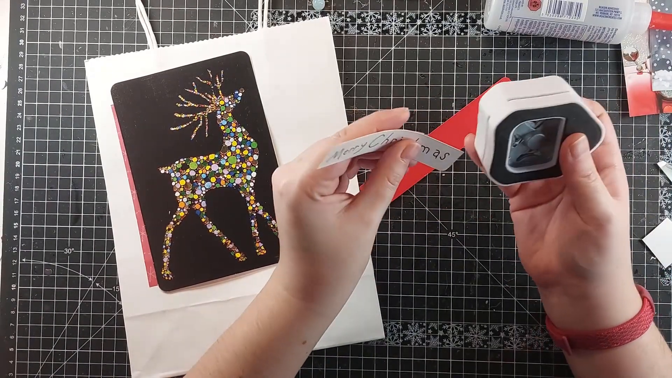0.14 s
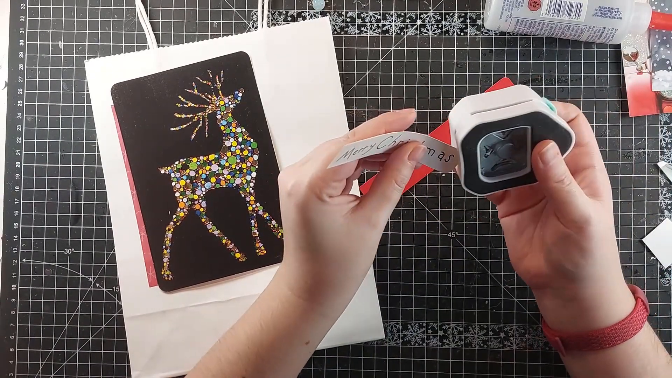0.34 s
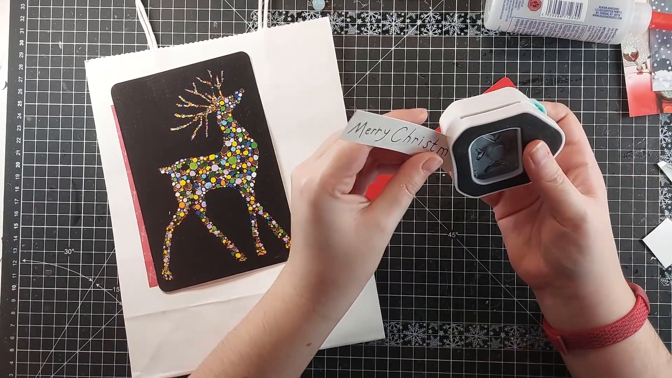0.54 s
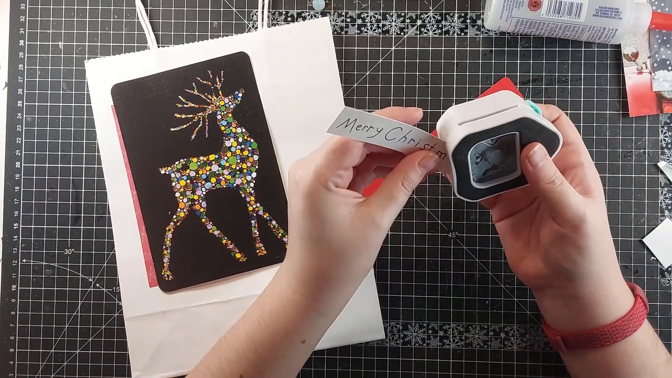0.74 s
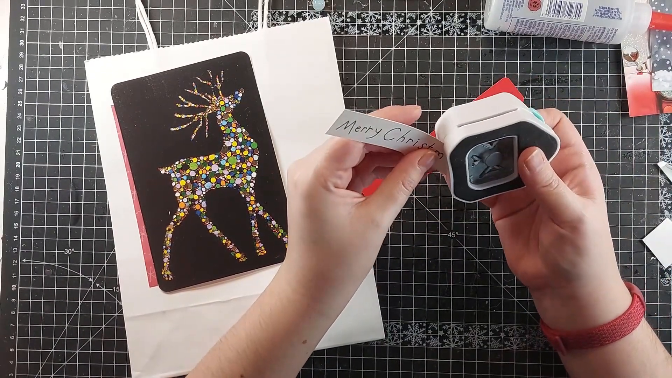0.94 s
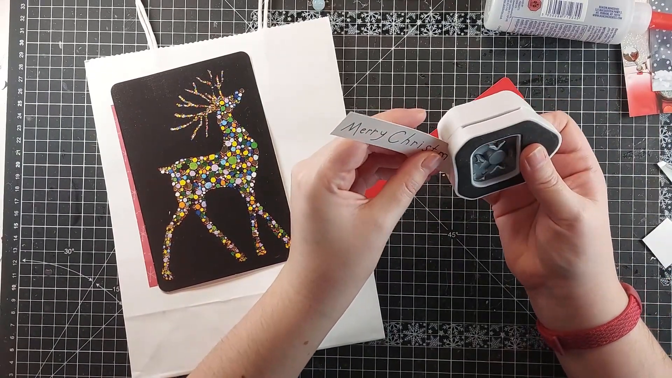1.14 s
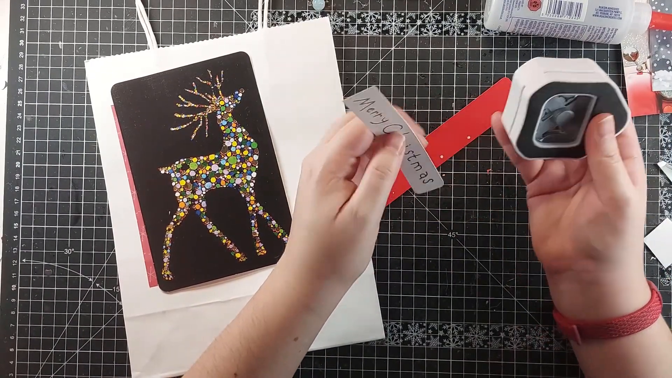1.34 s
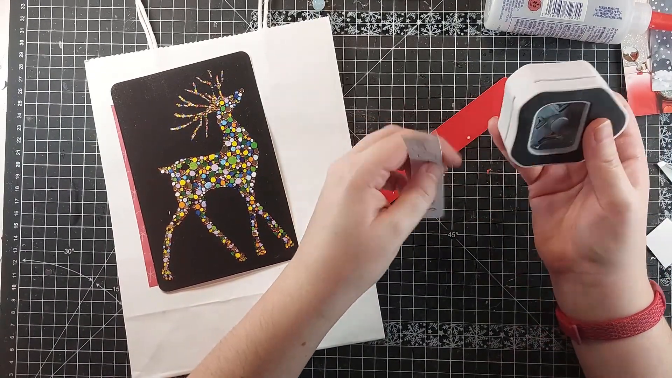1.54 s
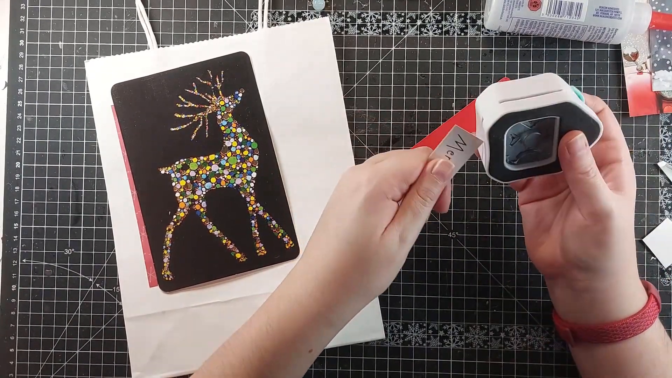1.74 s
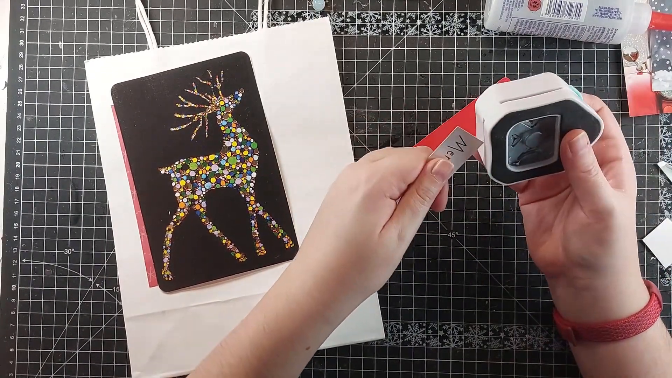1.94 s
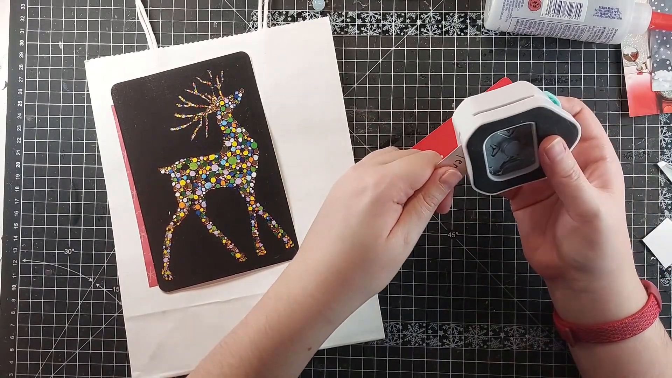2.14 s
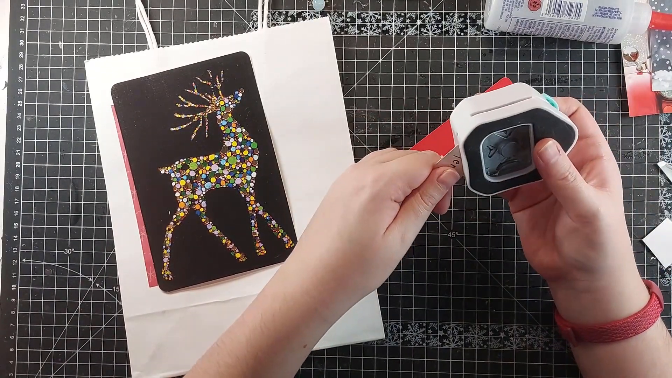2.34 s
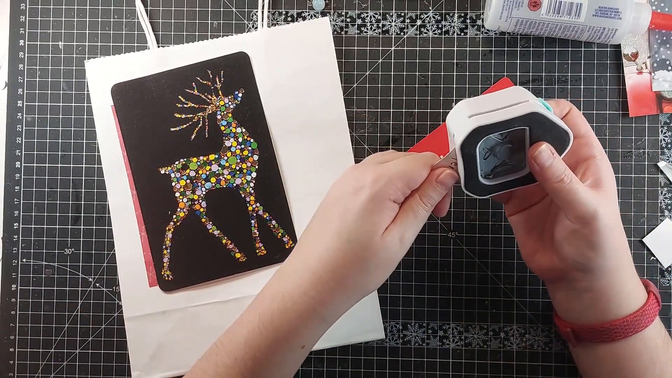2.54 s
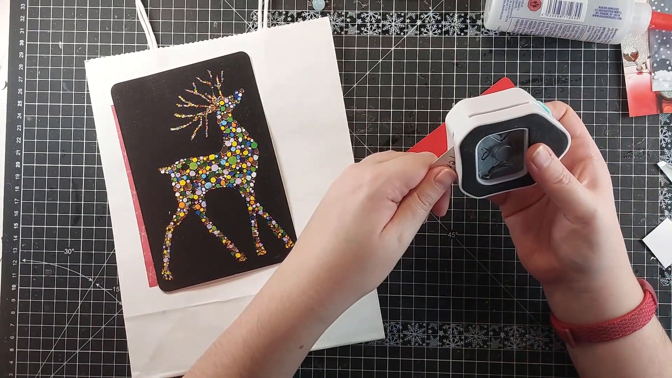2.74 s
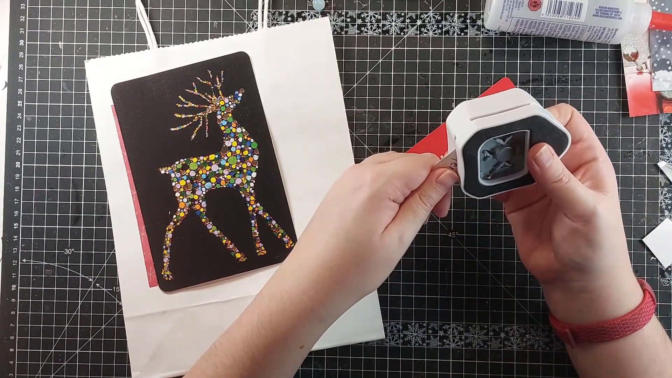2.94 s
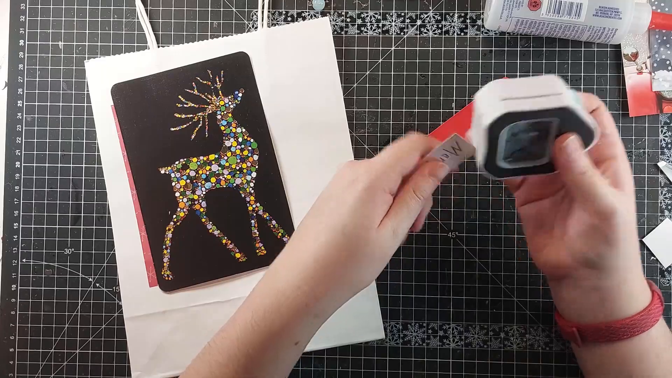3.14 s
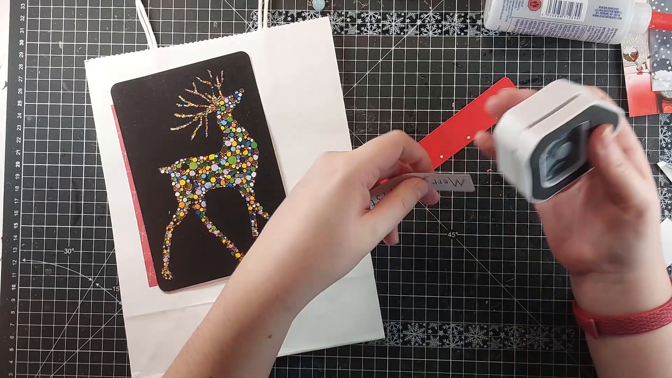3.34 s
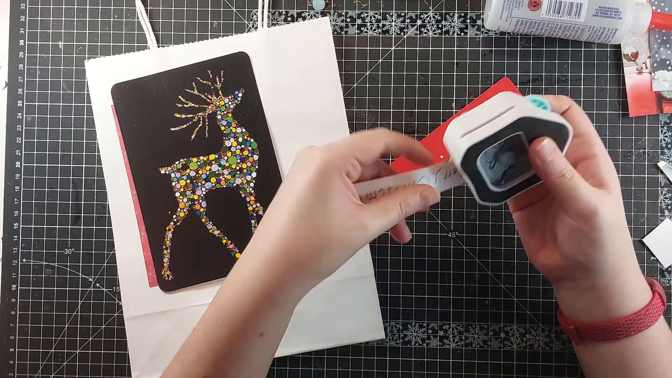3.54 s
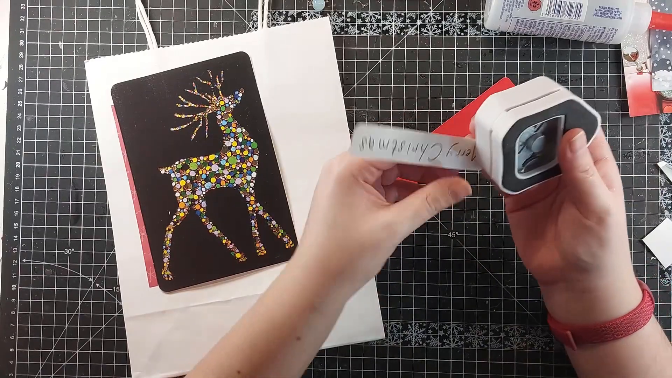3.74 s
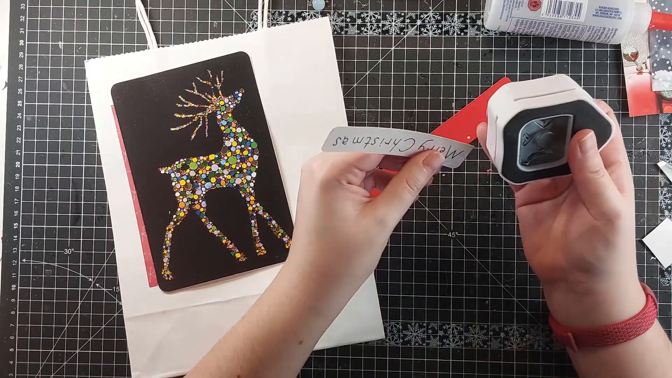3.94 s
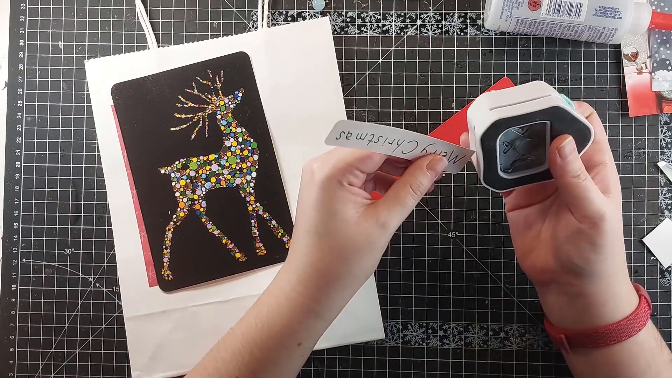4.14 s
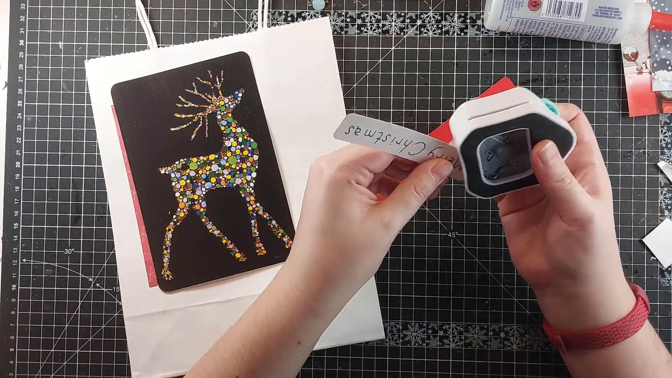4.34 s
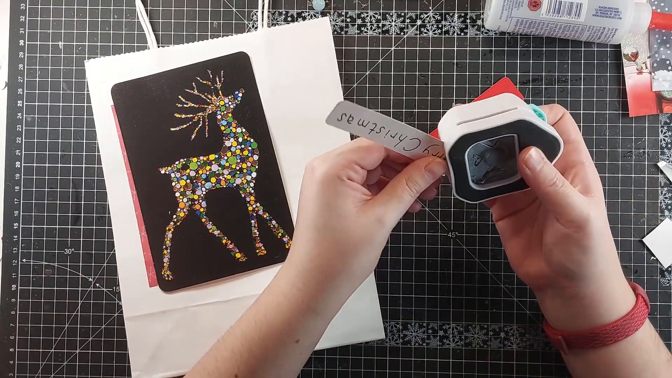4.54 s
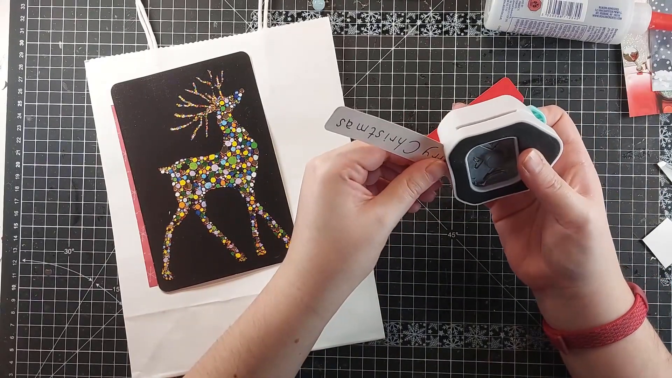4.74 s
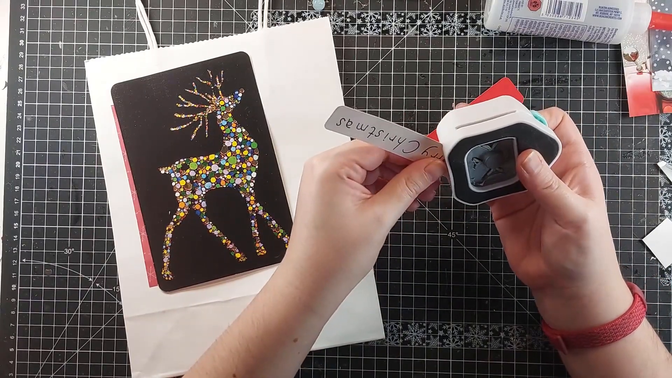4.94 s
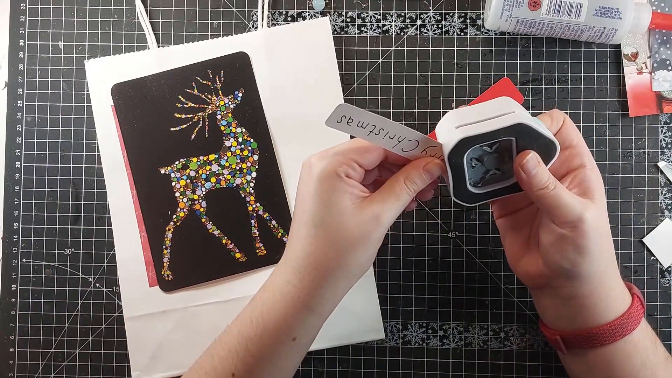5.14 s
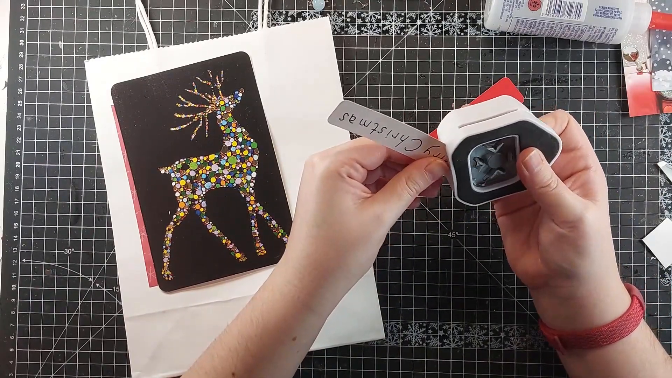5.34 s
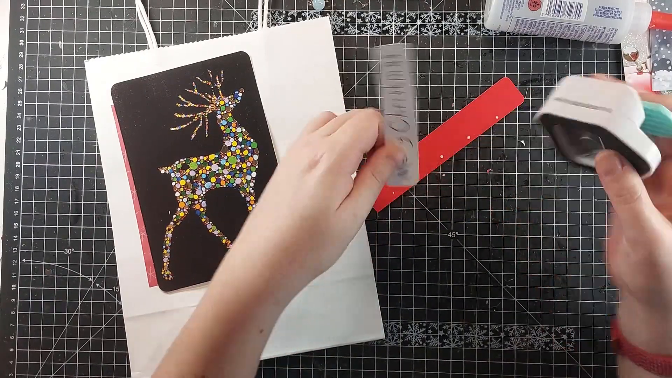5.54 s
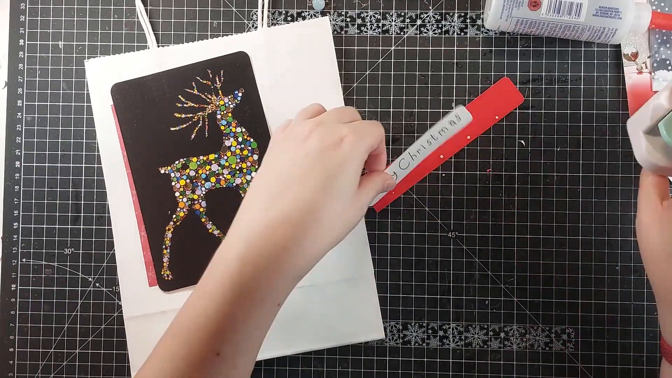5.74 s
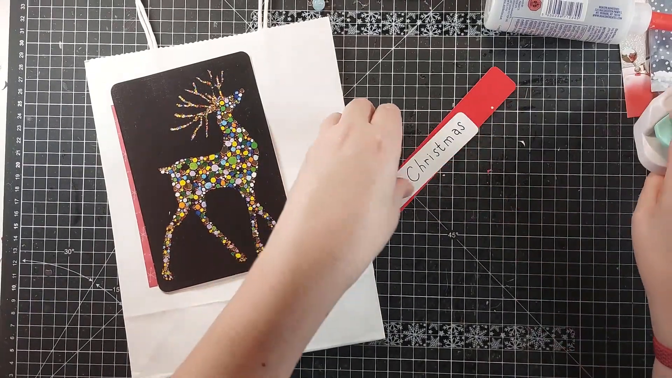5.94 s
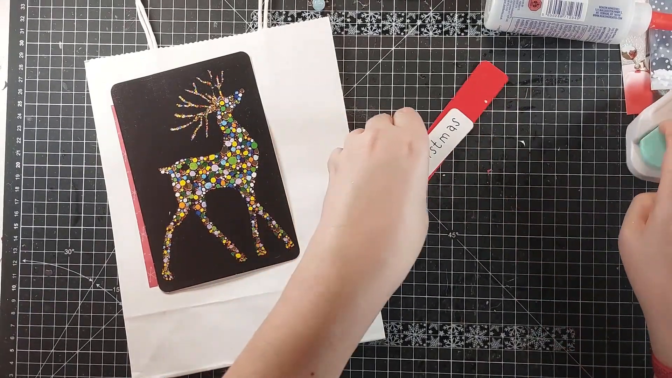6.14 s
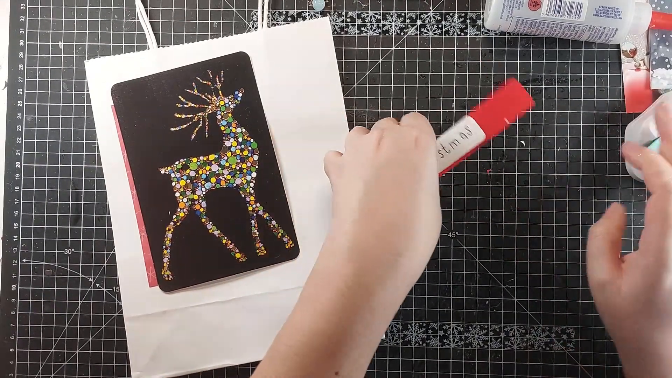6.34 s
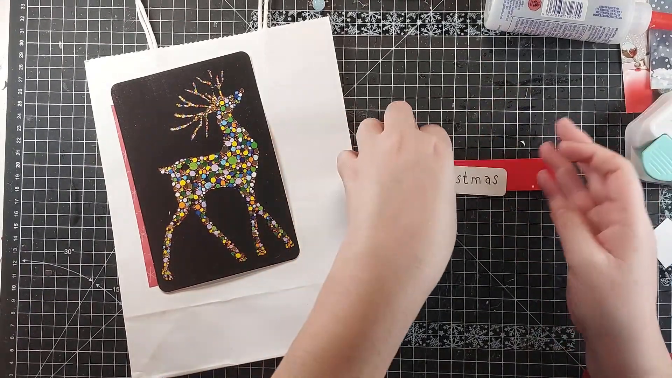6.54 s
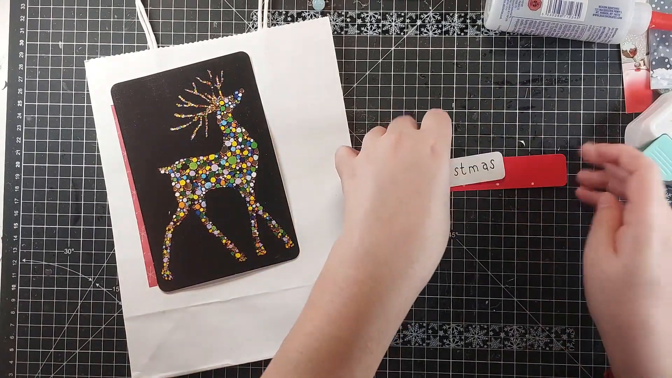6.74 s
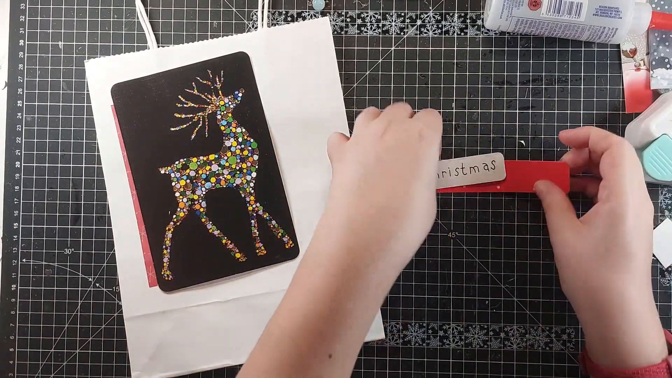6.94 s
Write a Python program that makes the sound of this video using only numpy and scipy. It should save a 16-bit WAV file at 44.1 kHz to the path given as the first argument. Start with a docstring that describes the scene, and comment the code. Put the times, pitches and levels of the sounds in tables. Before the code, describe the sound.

Close stereo pickup in a small quiet room. Fingers slide card into a little plastic punch with soft grainy scrapes and tiny ticks. Three hard, bright snaps come about two seconds apart, each with a brief tearing crunch and hollow plastic knock. Afterwards the punch shuffles on the mat, is put down with a woody thud, and light rustles follow.

```python
"""Fingers and card rub and tick on a small plastic corner punch over a craft table in a small quiet room.
Near 1.1, 3.0 and 5.2 s a squeeze makes the lever bite, then the blade snap through: tearing noise and a knock.
Between, the card strokes skin and slot as dense grainy noise; from 5.4 s the punch shuffles on the mat as well.
Near 6.2 s it is set down with a thud that rings the table top's modes; rustles and ticks follow to the end.
Sparse reflections surround the punch and card; rumble and hiss lie under everything."""
import sys
import numpy as np
from scipy import signal
from scipy.io import wavfile
from scipy.ndimage import uniform_filter1d

SR = 44100
rng = np.random.default_rng(int(sys.argv[2]) if len(sys.argv) > 2 else 0)


def volts_from_decibels(level):
    """Turn decibel levels (scalar or array-like) into linear amplitude factors."""
    exponent = np.asarray(level, float) / 20
    return 10 ** exponent


def to_wav(s):
    """Save 16-bit WAV."""
    ch = np.atleast_2d(s).T  # columns
    pcm = np.round(np.clip(ch, -1, 1) * 32767)  # PCM
    wavfile.write(sys.argv[1], SR, pcm.astype(np.int16))


N = 312669

# Event levels are set ahead of the final balance in record().
# Ring of the punch, from cavity through shell to blade and spring: mode_hz, width_hz, relative_level_db
PUNCH_MODES = [(386, 130, 2.5), (650, 230, -5.5), (1041, 89, 5.5), (1380, 190, -14), (1337, 130, 7),
               (1800, 850, 5.5), (2570, 700, 3), (2552, 94, 6.5), (3400, 1000, 4), (3890, 630, 0),
               (4030, 67, 2), (4710, 450, 1), (5700, 1200, -2.5), (7600, 900, 2.5), (9253, 760, 0),
               (10680, 1000, 1.5), (12000, 1200, 3), (14180, 1200, 3.5), (15970, 1100, -3.5)]
# Limits of the cavity, the shell, and the blade with its spring: low_hz, high_hz
PUNCH_BANDS = [(200, 1250), (1150, 3300), (2700, 20000)]
# Lever bites and blade snaps: knock_s, knock_db, bright_db, knock_hz, shear_ms
SNAPS = [(1.045, -21.5, -26, 2290, 11), (1.1216, 1, 4.5, 1602, 5.2), (2.9962, -12, -20.5, 1809, 5.3),
         (3.0295, -4, 0, 1473, 4.5), (5.1808, -17, -22, 1720, 6.5), (5.2745, -2, 1.5, 1480, 6.2)]
# Card and fingers ticking on the punch: knock_s, knock_db, bright_db, knock_hz, hollow_db
TICKS = [(.493, -36, -50, 1940, -46.5), (.509, -49, -37, 2230, -40), (.682, -42.5, -43, 1890, -53.5),
         (.9606, -53, -61.5, 1680, -70), (1.0132, -47, -44, 1630, -60), (1.21, -32, -30, 1483, -53),
         (1.238, -27, -29, 2790, -53), (1.444, -60, -41.5, 2490, -55.5), (1.5328, -70.5, -45, 2130, -61),
         (1.5762, -53, -44.5, 1915, -55.5), (1.6321, -60.5, -38.5, 2280, -59.5),
         (2.173, -60, -45.5, 2090, -49.5), (2.418, -48, -57, 2800, -50.5),
         (2.9745, -36, -38.5, 1900, -47.5), (3.0043, -29.5, -31, 1630, -45.5),
         (3.139, -30.5, -36.5, 1780, -45.5), (3.1922, -29, -37, 1800, -49), (3.4794, -62, -46.5, 2260, -61),
         (3.6177, -61, -44.5, 2054, -49.5), (3.678, -35, -38, 2220, -69), (3.8867, -64.5, -38, 2290, -65),
         (3.9544, -60, -33, 2165, -45.5), (4.2546, -20.5, -18, 2590, -27), (4.426, -35.5, -39.5, 1900, -51),
         (4.4501, -40, -49.5, 1780, -67), (4.479, -41, -52, 1700, -48.5), (4.586, -46, -57.5, 2000, -53.5),
         (4.7958, -48.5, -54, 1857, -48), (5.0887, -55.5, -51.5, 1644, -65),
         (5.1422, -47.5, -46, 1860, -58.5), (5.1883, -33, -35.5, 1670, -42), (5.4614, -34, -40, 1700, -50),
         (5.4959, -28, -22, 2010, -31), (5.5584, -50, -46.5, 1790, -50), (5.5862, -62.5, -42, 1740, -36.5),
         (5.6079, -46, -38, 2140, -38), (5.805, -69.5, -51, 2290, -58), (5.885, -55.5, -38.5, 2426, -69),
         (6.2417, -26, -26, 1380, -18), (6.389, -50.5, -42, 2480, -45), (6.4578, -63, -41.5, 2060, -61),
         (6.5079, -62, -39.5, 2510, -54), (6.8305, -42.5, -51, 2400, -55),
         (6.9526, -62, -48.5, 1960, -66.5), (7.0244, -62.5, -34, 1780, -57)]
# Strokes of the card: peak_s, skin_relative_db, slot_relative_db, rise_s (per 20 dB), fall_s (per 20 dB)
STROKES = [(0.0, -44.5, -50.5, .02, 0.0366), (.226, -69.5, -72, 0.17, 0.08),
           (.512, -45, -46.5, 0.04, 0.0268), (.62, -63, -63.5, 0.34, 0.24), (.686, -66, -57.5, .008, 0.05),
           (.85, -85, -70, 0.24, 1.2), (.964, -73, -55, .006, 0.34), (1.016, -47, -52, -0.01, 0.05),
           (1.043, -35, -37, 0.0057, -0.04), (1.19, -36.5, -41, -0.0423, 0.0322),
           (1.255, -44, -39, 0.0671, 0.0528), (1.282, -43, -40, 0.0464, 0.006),
           (1.386, -52.5, -66, 0.14, 0.11), (1.447, -50, -73.5, -0.06, 0.13), (1.486, -51, -82, 0, 0.22),
           (1.6, -47, -56, -0.2, 0.1037), (1.652, -55, -72, -0.02, .09), (1.832, -84, -66, -0.2, .045),
           (2.108, -67, -71.5, 0.14, 0.37), (2.18, -55.5, -63, 0.06, 0.08), (2.21, -68, -61, 0.12, -0.02),
           (2.418, -62.5, -59.5, -0.1, 0.12), (2.902, -82, -69, 0.23, 0.1), (2.978, -54, -44, -0.06, .1),
           (3.1, -48, -54, 0.0648, 0.14), (3.141, -50, -49, .005, 0.09), (3.17, -52, -48.5, 0.0056, 0.1354),
           (3.194, -42, -39, 0.01, 0.0638), (3.213, -43, -47.5, .02, 0.0555), (3.27, -55, -64, 0.06, 0.12),
           (3.386, -49.5, -61.5, 0.07, 0.1), (3.483, -57.5, -68, 0.08, 0.09), (3.52, -60, -67, 0.07, 0.12),
           (3.626, -52, -57, 0.04, .1), (3.676, -49.5, -46.5, -0.09, 0.06), (3.8, -57, -72, 0.1, -0.27),
           (3.834, -55.5, -62, -0.34, -0.1), (3.889, -47.5, -71.5, 0.07, 0.06),
           (3.92, -53, -55.5, -0.1, 0.05), (3.958, -50, -61, .006, .06), (4.33, -65, -61, 0.14, .1),
           (4.43, -55, -52, 0.02, 0.14), (4.492, -58, -46.5, 0.01, -0.0152), (4.582, -70, -68, 0.66, 0.2),
           (4.794, -63.5, -59, -0.03, 0.05), (5.004, -69.5, -79, 0.17, 0.1), (5.096, -68, -62.5, .04, 0),
           (5.145, -58, -54, 0.02, 0.1), (5.36, -49.5, -71.5, 0.1, -0.43), (5.414, -65, -57, 0.13, -0.1),
           (5.47, -43.5, -45.5, 0.0936, 0.0457), (5.5, -43, -45.5, 0.0945, 0.015),
           (5.59, -52, -50, 0.03, 0.14), (5.61, -50, -50.5, 0.05, 0.13), (5.715, -61, -61, .05, 0.15),
           (5.804, -63, -82, -0.5, 0.54), (5.889, -51.5, -62, -0.2, 0.28), (5.976, -52.5, -62, .04, 0.22),
           (6.07, -58, -72, .1, 0.2), (6.195, -51, -68, 0.11, .05), (6.26, -49, -43, 0.11, 0.14),
           (6.395, -45, -56.5, -0.11, 0.0254), (6.51, -49, -68, 0.03, 0.01), (6.55, -60, -78.5, 0.4, -0.1),
           (6.598, -58.5, -60, 0.16, 0.19), (6.65, -72, -58, -0.76, .05), (6.766, -66.5, -77, -1, 0.33),
           (6.832, -62.5, -54.5, -0.4, 0.02), (6.946, -53, -87.5, -0.17, -0.96), (7.028, -50, -76, 0.13, 0),
           (7.07, -47, -61, .05, 0.76)]
# Scrape pitch, set by how deep the card sits in the slot: time_s, pitch_hz
SLOT_PITCH = [(0, 1808), (.68, 1981), (.94, 1895), (.97, 1700), (1.03, 1800), (1.19, 1620), (1.29, 2154),
              (1.6, 2287), (3.196, 1768), (3.45, 2259), (3.7, 2252), (3.86, 1930), (4.49, 1780),
              (5.41, 1596), (5.5, 2068), (5.72, 1400), (5.9, 2500), (6.15, 2500), (6.28, 1650),
              (6.62, 1600), (6.85, 2192)]
# Colour of rubbing on skin: frequency_hz, relative_density_db (per Hz)
SKIN_COLOUR = [(1180, -21.5), (2000, -11.5), (2590, -6.5), (3130, -17), (5170, 0.5), (6100, -3), (7300, 2),
               (9000, -2.5), (12900, -1.5), (15700, -1)]
# Jolts that reach the table top: start_s, peak_db, left_minus_right_db, contact_ms
THUDS = [(1.042, -28.5, 3.5, .93), (1.118, -18.5, 2, 1), (2.992, -32, 8, 0.77), (3.027, -28, 7, .99),
         (3.19, -47, 12, 0.75), (4.251, -50.5, 2.1, .29), (5.175, -40.5, 11.5, .62), (5.269, -30, 5, 0.69),
         (5.557, -30.5, 4.5, 0.92), (5.583, -35, -2, 0.5), (5.622, -52, -1, .99), (5.923, -31.5, 8, 0.55),
         (5.943, -23, 3, 0.51), (6.099, -34, 0.5, 0.38), (6.227, -9, 3, 0.5), (6.244, -10, -3, 0.25),
         (6.271, -12.5, -2.5, 0.25), (6.388, -32, 2, 0.76), (6.493, -40, 11, 0.46), (6.589, -27.5, 5, 0.75),
         (6.621, -31, 1.5, 0.32), (6.789, -38, 8, 0.57), (6.829, -37.5, 4, 0.51)]
# Ring of the table top: mode_hz, relative_level_db, t60_s
TABLE_MODES = [(65, 0.5, 0.1), (116, 0.5, 0.2), (141, -3, 0.26), (196, -4, 0.07), (237.5, 0, 0.13),
               (263, 0.5, 0.1), (340, -3.5, 0.15), (435.7, -9.5, 0.03), (478, -7.5, 0.065), (578, -9, 0.11),
               (602, -8, 0.075), (722, -11, 0.054), (949.4, -6.5, 0.04), (1210, -8, 0.042),
               (1410, -2, 0.025), (1700, -9, 0.025)]
# Hands and punch shuffling on the mat: time_s, relative_level_db
SHUFFLE_LEVEL = [(5.399, -54), (5.456, -54.5), (5.756, -57.5), (5.929, -68), (5.978, -55), (6.096, -43.5),
                 (6.138, -55), (6.256, -44.5), (6.472, -53.5), (6.75, -51), (6.896, -56), (7.09, -60.5)]
# Dying time of the room: frequency_hz, t60_s
ROOM_DECAY = [(300, 0.32), (1100, .2), (2900, 0.18), (4200, .2), (7700, 0.15), (14000, 0.13)]
# Colour of the reflections: frequency_hz, relative_level_db
ROOM_COLOUR = [(300, -12.5), (700, -4), (1400, -14.5), (2500, -8), (4000, 1), (7000, -8), (10000, -4),
               (14000, -2.5)]
# Colour of rumble and hiss: frequency_hz, relative_density_db (per Hz)
AIR_COLOUR = [(12, -46), (20, -8.5), (53, 5), (107, -3), (176, -10.5), (233, -10.5), (585, -21.5),
              (1020, -20.5), (1310, -24.5), (1840, -29.5), (3490, -34), (5930, -40), (8290, -34.5),
              (13300, -35), (15700, -35.5)]
# Likeness of the air in left and right: frequency_hz, likeness (0 to 1)
AIR_LIKENESS = [(60, 0.59), (240, 0.23), (950, 0.0084), (3770, 0.072), (15000, 0.034)]


def evened(x):
    """Scales to rms 1."""
    return x / np.sqrt(np.mean(x ** 2) + 1e-20)


def peaked(x):
    """Scales to peak 1."""
    return x / abs(x).max()


def read(points, hz):
    """Reads a spectrum on a log-frequency axis."""
    f, value = np.transpose(points)
    return np.interp(np.log(hz + 1), np.log(f + 1), value)


def balance(left_minus_right_db):
    """Splits a level difference evenly between the two channels, in dB."""
    return left_minus_right_db * np.array([[0.5], [-0.5]])


def add(mix, s, sound):
    """Mixes a sound of several rows in at time s."""
    part = mix[:, round(s * SR):][:, :sound.shape[1]]
    part += sound[:, :part.shape[1]]


def pair(size, same):
    """Two noises that are partly alike, one for each microphone."""
    a, b = rng.standard_normal((2, size))
    return np.array([a, same * a + np.sqrt(1 - same ** 2) * b])


def spectra(same):
    """Random short-time spectra for both microphones, alike by the share same."""
    a, b, c, d = rng.standard_normal((N // 256 + 5, 513, 4)).T
    left, other = a + 1j * b, c + 1j * d
    return np.array([left, same * left + np.sqrt(1 - same ** 2) * other])


def coloured(points, z):
    """Turns random short-time spectra into noise of rms 1 with the given colour."""
    hz = np.fft.rfftfreq(1024, 1 / SR)
    z = z * volts_from_decibels(read(points, hz))[:, None]
    noise = signal.istft(z, nperseg=1024, noverlap=768)[1]
    return evened(noise[:, :N])


def ring(lo, hi, knock_hz=None):
    """Impulse response of one part of the punch; the grip shifts its modes a little and favours one pitch."""
    t = np.arange(1024) / SR
    shift = 1 + 0.02 * rng.standard_normal(len(PUNCH_MODES))
    modes = np.zeros(len(t))
    for k, (hz, width, db) in enumerate(PUNCH_MODES):
        if lo <= hz < hi:
            decay = width * np.exp(-np.pi * width * t)
            modes += (-1) ** k * volts_from_decibels(db) * decay * np.sin(2 * np.pi * hz * shift[k] * t)
    modes = peaked(modes)
    if knock_hz:
        modes = modes - 1.3 * np.exp(-np.pi * 300 * t) * np.sin(2 * np.pi * knock_hz * t)
    band = signal.butter(3, (lo, hi), "band", fs=SR, output="sos")
    return signal.sosfilt(band, modes)[None]


def click(s, knock_db, hollow_db, bright_db, shear_ms, knock_hz, crackle):
    """Fibres tear harder and harder, then one knock and a short crackle; the treble tears late.
    Rows: left, right, and twice the bare knock of equal energy, which is what spreads to the walls."""
    ms = np.arange(-441, 1764) / SR * 1000  # from the knock
    shear = np.clip(1 + ms / shear_ms, 0, 1)
    hit = ms == 0
    # impulse response, level dB, left-right likeness, tearing curve, crackle fall ms, knock strength
    parts = [(ring(*PUNCH_BANDS[0]), hollow_db, 0.9, 0.6, 3.0, 6.0),
             (ring(*PUNCH_BANDS[1], knock_hz), knock_db, 0.7, 1.2, 1.2, 7.0),
             (ring(*PUNCH_BANDS[2]), bright_db, 0.2, 3.0, 2.0, 1.5)]
    sound = 0
    for response, db, same, curve, fall_ms, knock in parts:
        dying = np.exp(-np.maximum(ms, 0) / (fall_ms * crackle))
        blow = pair(len(ms), same) * np.where(ms < 0, shear ** curve, dying)
        near = peaked(signal.fftconvolve(blow + knock * hit, response, axes=1))
        spread = signal.fftconvolve(np.ones((2, 1)) * hit, response, axes=1)
        sound = sound + volts_from_decibels(db) * np.vstack([near, evened(spread) * near.std()])
    return s - 0.01, sound


def snaps():
    """The lever bites, then the blade shears through the card and knocks, with the cavity under it."""
    punch = np.zeros((4, N))
    for s, knock_db, bright_db, hz, shear_ms in SNAPS:
        hollow_db = knock_db - 18.5
        add(punch, *click(s, knock_db, hollow_db, bright_db, shear_ms, hz, crackle=1.05))
    return punch


def ticks():
    """Card and fingers touch the punch: the same knock with hardly any tearing ahead of it."""
    punch = np.zeros((4, N))
    for s, knock_db, bright_db, hz, hollow_db in TICKS:
        add(punch, *click(s, knock_db, hollow_db, bright_db, 0.18, hz, crackle=1))
    return punch


def strokes():
    """Level of skin rubbing and slot scraping: each stroke climbs and falls straight in dB; powers add up."""
    t = np.arange(0, N + 64, 64) / SR
    power = np.zeros((2, len(t)))
    for s, skin_db, slot_db, rise_s, fall_s in STROKES:
        # slopes under 4 ms, negative ones too, are taken as 4 ms
        rise, fall = (s - t) / max(rise_s, 0.004), (t - s) / max(fall_s, 0.004)
        under_db = np.minimum(20 * np.where(t < s, rise, fall), 150)
        power += volts_from_decibels(np.array([[skin_db], [slot_db]]) - under_db) ** 2
    return np.array([np.interp(np.arange(N) / SR, t, p) for p in np.sqrt(power)])


def resonate(x, hz, width):
    """A resonance of gain 1 that follows the curve hz."""
    turn = np.exp(2j * np.pi * np.cumsum(hz) / SR)
    r = np.exp(-np.pi * width / SR)
    return 2 * (turn * signal.lfilter([1 - r], [1, -r], x / turn)).real


def grains():
    """Uneven strength of rubbing on skin and in the slot: random tiny slips over a steady share."""
    slips_per_s = np.array([[900], [250]])
    size_db = [[3.0], [4.0]] * np.minimum(rng.exponential(1, (N, 2)).T, 2.5)
    slips = volts_from_decibels(size_db) * (rng.random((N, 2)).T < slips_per_s / SR)
    slips = uniform_filter1d(slips, 40, axis=1)
    return [[0.8], [0.6]] + [[0.3], [0.18]] * slips / slips.mean(1, keepdims=True)


def rubbing():
    """Dense tiny slips: bright on the fingers, pitched by the shell and cavity in the slot."""
    skin_level, slot_level = uniform_filter1d(strokes(), 80, axis=1)
    skin_grain, slot_grain = grains()
    skin = evened(coloured(SKIN_COLOUR, spectra(0.2)) * skin_grain)
    scrape = pair(N, 0.4) * slot_grain
    body = ring(*PUNCH_BANDS[1]) + volts_from_decibels(-4.5) * ring(*PUNCH_BANDS[0])
    shell = evened(signal.fftconvolve(scrape, body, axes=1)[:, :N])
    s, pitch_hz = np.transpose(SLOT_PITCH)
    pitch = np.interp(np.arange(N) / SR, s, pitch_hz)
    slot = evened(shell + 1.9 * evened(resonate(scrape, pitch, 280)))
    rubs = skin * skin_level * volts_from_decibels(2.5) + slot * slot_level
    return rubs * volts_from_decibels(balance(0.5))


def board():
    """The table top's ring; where it is touched decides how strongly each mode speaks."""
    t = np.arange(SR // 3) / SR
    place = [2, 0.02] * rng.standard_normal((len(TABLE_MODES), 2))  # dB and share of pitch
    modes = np.zeros(len(t))
    for k, (hz, db, t60) in enumerate(TABLE_MODES):
        level = volts_from_decibels(db + place[k, 0] - 60 * t / t60)
        modes += (-1) ** k * level * np.sin(2 * np.pi * hz * (1 + place[k, 1]) * t)
    # too small to radiate lower
    return signal.sosfilt(signal.butter(4, 60, "high", fs=SR, output="sos"), modes)


def thud(db, left_minus_right_db, contact_ms, rattle_ms):
    """A soft push and a short rattle set the table top ringing; long contact keeps it dull."""
    ms = np.arange(SR // 10) / SR * 1000
    push = ms * np.exp(-ms / contact_ms)
    rattle = pair(len(ms), 0.95) * np.exp(-ms / rattle_ms)
    rattle[:, 0] += 13.0  # the first touch
    pushed_board = signal.fftconvolve(board(), push)[None]
    sound = signal.fftconvolve(rattle, pushed_board, axes=1)
    return volts_from_decibels(db + balance(left_minus_right_db)) * peaked(sound)


def thuds():
    """Jolts of the table top, the strongest ones as the punch is set down."""
    table = np.zeros((2, N))
    for s, db, left_minus_right_db, contact_ms in THUDS:
        rattle_ms = 14 + 0.01 * db  # weaker jolts settle a touch sooner
        add(table, s, thud(db, left_minus_right_db, contact_ms, rattle_ms))
    return table


def shuffle():
    """Steady dull friction on the mat feeds the table top."""
    s, db = np.transpose(SHUFFLE_LEVEL)
    dull = signal.lfilter([1], [1, -np.exp(-2 * np.pi * 250 / SR)], pair(N, 0.92))  # low-pass near 250 Hz
    drag = evened(signal.fftconvolve(dull, board()[None], axes=1)[:, :N])
    level_db = np.interp(np.arange(N) / SR, s, db, left=-120)
    return drag * volts_from_decibels(level_db + balance(5))


def room(x):
    """Sparse reflections of random sign from table and walls, each band dying at its own speed."""
    taps = np.zeros((2, SR // 2))
    slots = np.arange(120, SR // 2 - 10, 10)  # one reflection in every 10 samples
    at = slots + rng.integers(0, 10, (2, len(slots)))
    np.put_along_axis(taps, at, rng.choice([-1., 1.], at.shape), 1)
    hz, t, z = signal.stft(taps, SR, nperseg=128)
    z = z * volts_from_decibels(read(ROOM_COLOUR, hz)[:, None] - 60 * t / read(ROOM_DECAY, hz)[:, None])
    tail = signal.istft(z, SR, nperseg=128)[1]
    return signal.fftconvolve(x, tail / np.linalg.norm(tail[0]), axes=1)[:, :N]


def air():
    """The quiet of the room: low rumble and microphone hiss as coloured noise."""
    same = read(AIR_LIKENESS, np.fft.rfftfreq(1024, 1 / SR))[:, None]
    return volts_from_decibels(-57.0 + balance(3)) * coloured(AIR_COLOUR, spectra(same))


def scene():
    """Punch and card sound in the room; the table reaches the microphones directly."""
    punch = snaps() + ticks()
    near, spread = punch[:2], punch[2:]
    rubs = rubbing()
    reflections = volts_from_decibels(1.0) * room(spread) + volts_from_decibels(-6) * room(rubs)
    return near + rubs + thuds() + shuffle() + reflections + air()


def band_limit(x):
    """A steep low-pass at the top of the band."""
    return signal.sosfilt(signal.butter(12, 15890, fs=SR, output="sos"), x)


def record(dry):
    """The microphones drop the deepest bass and lean slightly left; peaks are clipped at full scale."""
    heard = signal.sosfilt(signal.butter(4, 40, "high", fs=SR, output="sos"), dry)
    finished = np.clip(heard * volts_from_decibels(balance(0.6)), -1, 1)
    return band_limit(finished)


dry = scene()
out = record(dry)
to_wav(out)
```